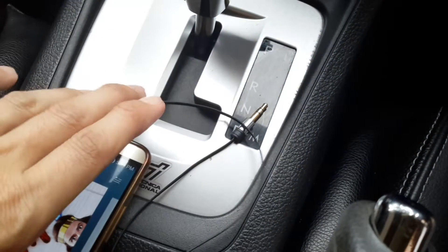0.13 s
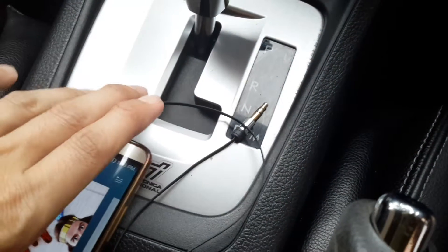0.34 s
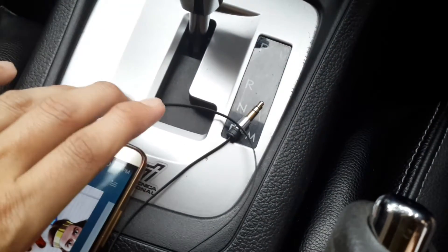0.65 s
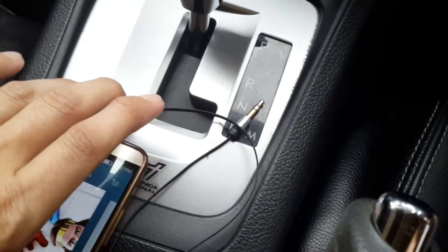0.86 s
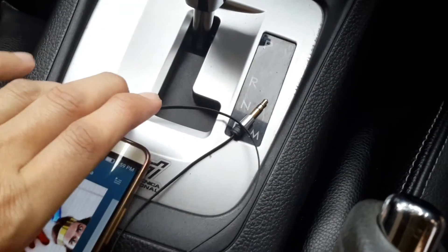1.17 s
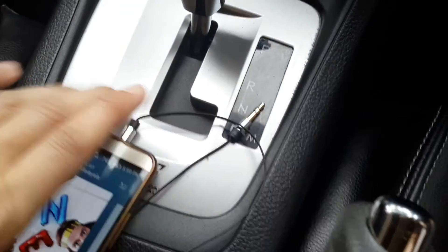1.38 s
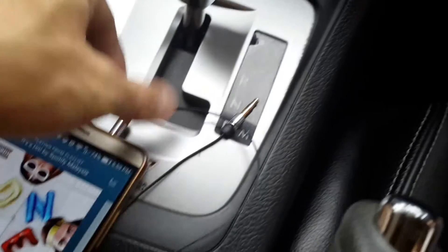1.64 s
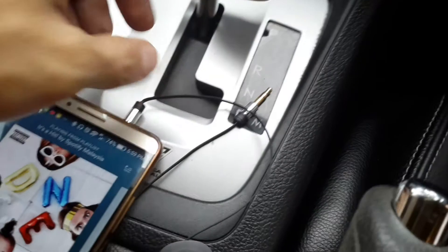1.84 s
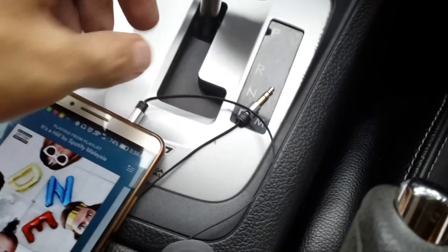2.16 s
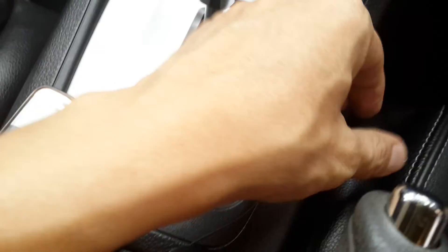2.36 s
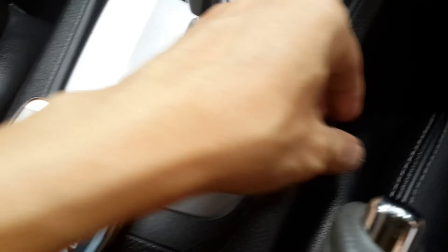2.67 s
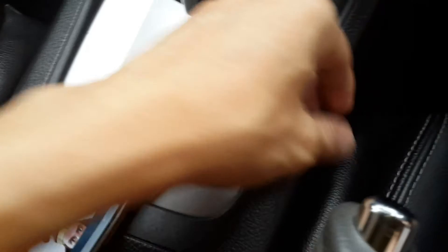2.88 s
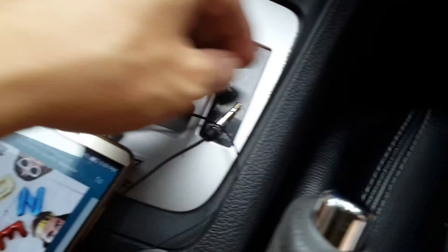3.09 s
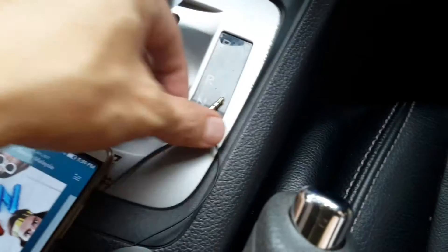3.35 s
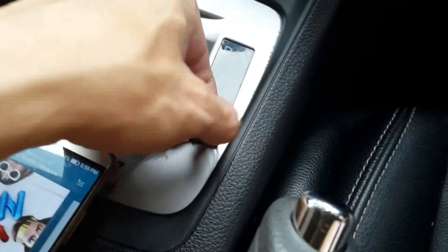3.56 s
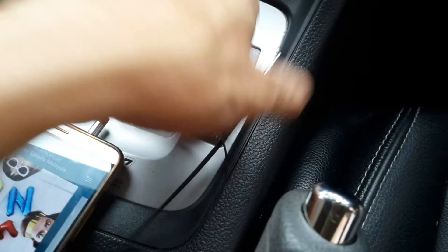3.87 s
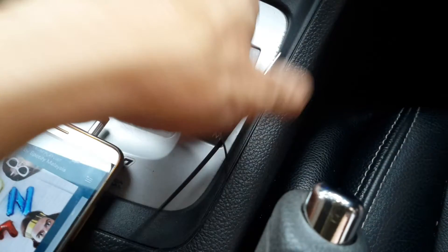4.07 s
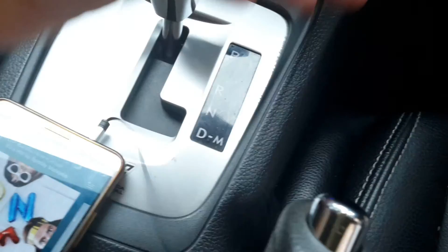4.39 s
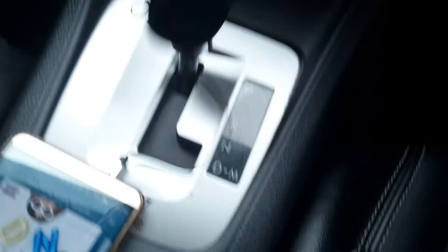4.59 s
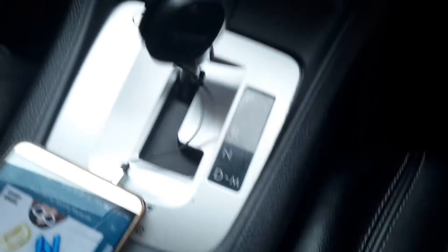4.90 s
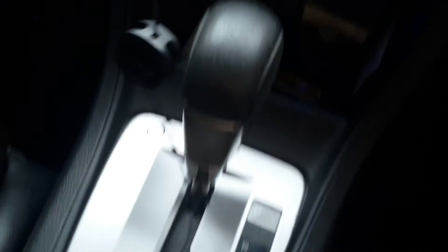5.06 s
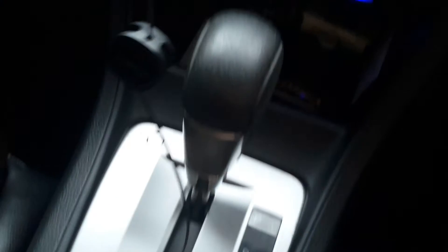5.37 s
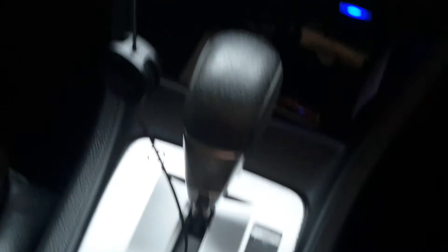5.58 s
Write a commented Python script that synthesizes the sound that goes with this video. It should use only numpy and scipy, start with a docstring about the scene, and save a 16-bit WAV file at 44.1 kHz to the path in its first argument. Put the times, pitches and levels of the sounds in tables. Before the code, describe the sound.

Inside a quiet closed car, a plug and cable tick on hard plastic, one click sharp and loud. After a lull, ticks multiply as the cable is pulled away, peaking in a crisp, hissy rattle. A last click, a soft rub and low handling thuds follow. Close handheld microphone, thin high hiss and faint low murmur.

```python
"""Cabin murmur and microphone hiss run throughout a closed, parked car where a hand moves a phone.
A few ticks of metal plug and cable on hard plastic come first, one of them loud, with trim thuds and a shifting grip.
From 2.7 s the cable drags off the gear console: ticks crowd in, hardest near 4.06 s, hiss and rattle surge to 4.3 s.
Near 4.95 s come last ticks and a palm rub; squeezes and thuds follow to 5.4 s.
Ticks excite port, shell and panel resonances; the rest is shaped noise and damped low cycles. Port rings near 8.6 kHz."""
import sys
import numpy as np
from scipy import signal
from scipy.io import wavfile
from scipy.ndimage import uniform_filter1d

SR = 44100
rng = np.random.default_rng(int(sys.argv[2]) if len(sys.argv) > 2 else 0)


def ratio(d):
    """dB to gain"""
    e = np.asarray(d, float) / 20
    return 10 ** e


def generate_wav(sig):
    """Save sig (samples, or channels by samples) to the path in sys.argv[1] as 16-bit PCM at SR."""
    pcm = np.round(np.clip(np.atleast_2d(sig).T, -1, 1) * 32767).astype(np.int16)
    wavfile.write(sys.argv[1], SR, pcm)


N = 253134  # samples


def evened(x):
    """Scale to unit rms."""
    return x / np.sqrt(np.mean(x ** 2) + 1e-20)


def peaked(x):
    """Scale to unit peak."""
    return x / abs(x).max()


def smoothed(x, size):
    """Two running means in a row."""
    return uniform_filter1d(uniform_filter1d(x, size=size), size=size)


def read(points, hz):
    """Spectrum in dB, linear over log frequency, falling to -100 dB an octave beyond its ends."""
    f, db = np.transpose(points)
    octaves = np.log2(np.r_[f[0] / 2, f, f[-1] * 2])
    return np.interp(np.log2(hz + 1), octaves, np.r_[-100, db, -100])


def add(mix, start_s, sound):
    """Mix a sound in at its start time, cut at the end of the mix."""
    part = mix[round(start_s * SR):][:len(sound)]
    part += sound[:len(part)]


def causal(points):
    """Minimum-phase impulse response with the given colour."""
    half = np.log(ratio(read(points, np.fft.rfftfreq(2048, 1 / SR))))
    full = np.r_[half, half[-2:0:-1]]
    phase = -signal.hilbert(full).imag
    return np.fft.ifft(np.exp(full + 1j * phase)).real[:1024]


def noise(points, patchy_db, swell_db, size=1024):
    """Unit-rms noise: random short-time spectra with drifting patches and a slow swell."""
    frames, hz = 4 * N // size + 5, np.fft.rfftfreq(size, 1 / SR)
    real, imag, patches = rng.standard_normal((frames, len(hz), 3)).T
    patches = uniform_filter1d(patches, size=10, axis=0)  # over frequency
    patches = evened(uniform_filter1d(patches, size=12, axis=1))  # over time
    swell = evened(smoothed(rng.standard_normal(frames), 30))
    level_db = read(points, hz)[:, None] + patchy_db * patches + swell_db * swell
    spectra = (real + 1j * imag) * ratio(level_db)
    return evened(signal.istft(spectra, nperseg=size, noverlap=size - size // 4)[1][:N])


RISE_SHARE, ENDS_DB = 0.27, -22.5  # rise as share of length; level at each end re peak


def swells(peaks_s, levels_db, lengths_s):
    """Summed gains that rise to each peak and fall away again, straight in dB."""
    t = np.arange(N) / SR
    gain = np.zeros(N)
    for peak_s, db, length_s in zip(peaks_s, levels_db, lengths_s):
        away = np.maximum((peak_s - t) / RISE_SHARE, (t - peak_s) / (1 - RISE_SHARE)) / length_s
        gain += ratio(db + ENDS_DB * away)
    return gain


def rung(modes, spot_hz, db_per_octave):
    """Modes of a struck part, randomly off pitch and level; the struck spot favours those near its pitch."""
    t = np.arange(4096) / SR
    out = np.zeros(len(t))
    for hz, db, t60_s in modes:
        off, lean = rng.standard_normal(2)
        start_db = db + 4.4 * lean - db_per_octave * abs(np.log2(hz / spot_hz))
        out += ratio(start_db - 60 * t / t60_s) * np.sin(2 * np.pi * hz * (1 + 0.032 * off) * t)
    return out


# plug, cable and phone on hard plastic: (time [s], port ring peak [dB], snap re port [dB],
# panel re port [dB], favoured panel pitch [Hz], favoured snap pitch [Hz])
TICKS = [(0.4353, -45, -3.5, -1, 996, 3500), (0.5105, -33.5, -7, -5.5, 1190, 6000),
         (0.549, -45, -25, -9.5, 760, 6700), (0.8735, -11, -9.5, -17, 1280, 4900),
         (0.668, -62, -4, -18, 894, 6500), (1.133, -51.5, -18, -1, 977, 4000),
         (1.491, -65, -1, -14, 806, 5020), (1.543, -62, -25, -6, 800, 5000),
         (1.595, -57, -7, 11.5, 513, 2700), (2.483, -40.5, -10.5, -4, 790, 3500),
         (2.9533, -56, -12, 15, 680, 2700), (2.9539, -60, -13, 14, 1690, 2700),
         (3.145, -58, 0, -2, 1600, 4100), (3.2047, -51.5, -4, 5.5, 900, 4100),
         (3.281, -51, -4, 4, 856, 4100), (3.308, -39.5, -27, -7.5, 796, 5600),
         (3.4136, -39.5, -2, 0.5, 1050, 3300), (3.4315, -50, -3, -18, 773, 6200),
         (3.461, -25.5, -5.5, -10.5, 1050, 3600), (3.5264, -33, -4, -9, 1220, 5200),
         (3.557, -51, -13, 0, 1790, 2700), (3.642, -46, -5, -17, 848, 3000),
         (3.6689, -35, -10, 0, 1850, 3000), (3.731, -38, 3, -0.5, 1560, 3500),
         (3.7535, -47, -15, -11, 1000, 3000), (3.7687, -25.5, -3.5, -7, 2320, 4000),
         (3.8011, -34.5, -7.5, 1, 1120, 3200), (4.0257, -40.5, -16.5, 0, 1020, 5200),
         (4.036, -45, -18, 8.5, 735, 4800), (4.0463, -32, -6, 4, 1050, 5200),
         (4.0625, -8.5, -11.5, -15.5, 1670, 5800), (4.0658, -22.5, -6, -0.5, 1500, 5100),
         (4.068, -21.5, -6.5, -8, 866, 5100), (4.071, -28.5, -11, -15, 1300, 5100),
         (4.075, -25, -4, 3, 900, 5100), (4.078, -13.5, -13, -18.5, 1300, 5500),
         (4.085, -25, -2, -11, 1390, 4900), (4.089, -28.5, -10, -2, 1610, 5100),
         (4.1004, -37, 2.5, 7, 1740, 5500), (4.1064, -39, 7, 8, 1740, 2700),
         (4.1255, -41, -12, 13, 1660, 2700), (4.143, -28.5, -2.5, 1, 1380, 6000),
         (4.158, -29.5, -4, -21.5, 1340, 5000), (4.164, -25, -7.5, -2, 1010, 3200),
         (4.1799, -37.5, -1, 7, 1000, 3000), (4.187, -27, 1, 1, 1370, 9100),
         (4.1924, -26, 3.5, -4, 1400, 9100), (4.1932, -22, -3, -5, 1530, 5500),
         (4.196, -25, -8, -5, 1480, 11000), (4.1985, -29, 3, -12, 1510, 5100),
         (4.2021, -25, -1, 3, 1540, 5100), (4.205, -27, -2, -2.5, 1200, 4100),
         (4.2084, -26.5, 5, 5.5, 1500, 5100), (4.226, -30, 0, -3.5, 1380, 5500),
         (4.251, -27.5, 2, -20, 1630, 9100), (4.257, -26, -12, -18, 1700, 4100),
         (4.266, -34, -4, -5, 1700, 3300), (4.345, -30.5, -7.5, -9.5, 900, 6000),
         (4.594, -56, 4.5, 2, 767, 5200), (4.947, -30, -12, -17, 813, 5100),
         (4.9495, -17.5, -22, -28, 813, 5050), (4.95, -24, -11, -20, 826, 14000),
         (4.957, -30, -16, -25, 826, 6700)]
# microphone port resonance: (frequency [Hz], relative level [dB])
PORT = [(3820, -36), (6500, -13.5), (7480, -7), (8190, 2), (8530, 6), (9310, -1), (11000, -20.5),
        (12000, -25), (12900, -29), (14500, -32.5)]
# plug and shell modes: (nominal frequency [Hz], relative level [dB], t60 [s])
SNAP_MODES = [(2790, 4, 0.0037), (3300, 1, 0.005), (4100, -2, 0.004), (5070, 0.5, 0.0063),
              (5600, -7, 0.005), (6700, 6.5, 0.0047), (9100, 3.5, 0.015), (11000, -2.5, 0.0081),
              (13900, -14, 0.0044)]
# plastic panel modes: (nominal frequency [Hz], relative level [dB], t60 [s])
PANEL_MODES = [(434, -13, 0.033), (687, -8.5, 0.04), (840, -12, 0.032), (1050, -5, 0.029),
               (1300, -4, 0.0063), (1640, 9, 0.011), (1960, -2.5, 0.014), (2247, 5, 0.017)]
HELD_FROM_S = 4.04  # cable lies loose before, fingers damp it after
LOOSE_T60_S, HELD_T60_S, PANEL_T60_SHARE = 0.048, 0.031, 0.87  # close reflections
CABIN_T60_S, CABIN_DB = 0.24, (-23.5, -19.5, -18.5)  # late reflections at port, shell, panel
LOOSE_CRACK_DB, HELD_CRACK_DB = 18.5, 21  # first contact over reflections, for a tick at FIRM_DB
HARDER_DB_PER_DB, FIRM_DB = 0.15, -24  # stronger ticks have a harder first contact
CRACK_DELAY_S = 0.00051  # short slip before the contact
CONTACT_S = (0.00002, 0.00004, 0.00008)  # contact pulse width at port, shell, panel
REBOUND_S, REBOUND_DB = 0.00024, -2.5  # delay, mean level re contact


def ticks():
    """One hard contact and its reflections excite the port, the brittle shell modes and the panel modes."""
    out, t = np.zeros(N), np.arange(SR // 4) / SR
    port = causal(PORT)
    for start_s, db, snap_db, panel_db, panel_hz, snap_hz in TICKS:
        held = start_s > HELD_FROM_S
        t60_s, crack_db = (HELD_T60_S, HELD_CRACK_DB) if held else (LOOSE_T60_S, LOOSE_CRACK_DB)
        height = ratio(crack_db + HARDER_DB_PER_DB * (db - FIRM_DB))
        contacts = [height * np.exp(-((t - CRACK_DELAY_S) / w) ** 2) / np.sqrt(1 + 2 * (w * SR) ** 2)
                    for w in CONTACT_S]
        rebound = ratio(rng.normal(REBOUND_DB, 2)) * np.roll(contacts[0], round(REBOUND_S * SR))
        contacts[0] = contacts[0] + rebound  # port only

        dense, lumps = rng.standard_normal((2, len(t)))
        clumps = ratio(2.1 * evened(uniform_filter1d(lumps, size=30)))
        reflections = dense * (1 - np.exp(-t / 0.0017))
        late = reflections * ratio(-60 * t / CABIN_T60_S)
        bodies = port, rung(SNAP_MODES, snap_hz, 24.7), rung(PANEL_MODES, panel_hz, 23.2)
        t60s = t60_s, t60_s, PANEL_T60_SHARE * t60_s
        levels_db = db, db + snap_db, db + panel_db
        tick = np.zeros(len(t))
        for body, contact, ring_s, late_db, level_db in zip(bodies, contacts, t60s, CABIN_DB, levels_db):
            close = reflections * clumps * ratio(-60 * t / ring_s)
            drive = contact + close + ratio(late_db) * late
            tick += ratio(level_db) * peaked(signal.fftconvolve(drive, body)[:len(t)])
        add(out, start_s, tick)
    return signal.sosfilt(signal.butter(2, 250, "high", fs=SR, output="sos"), out)


# cable gathered up over plastic: (time [s], slip hiss level [dB], panel rattle level [dB])
DRAG = [(2.7, -102, -91), (3.05, -75.5, -69), (3.3, -65.5, -68), (3.5, -62, -57.5), (3.82, -55.5, -56.5),
        (4.01, -58, -57), (4.13, -68, -58), (4.17, -53, -56), (4.269, -44.5, -53.5), (4.335, -57.5, -57.5),
        (4.39, -60.5, -61), (4.549, -69, -64.5)]
# short jerks of the cable: (peak time [s], hiss level [dB], rattle level [dB], length [s])
JERKS = [(0.44, -56, -56.5, 0.12), (0.554, -62, -61, 0.21), (1.64, -67.5, -61, 0.99),
         (4.062, -103, -46, 0.15), (4.093, -41.5, -42.5, 0.115), (4.19, -29.5, -34, 0.04),
         (4.324, -49.5, -57, 0.038)]
# hiss of the slips: (frequency [Hz], relative level [dB])
DRAG_COLOUR = [(2600, -12), (5000, -19.5), (7100, -16), (7800, -15.5), (8200, 4.5), (8600, -1.5),
               (9000, -4), (10700, -15), (13500, -30)]
# rattle of the panel: (frequency [Hz], relative level [dB])
RATTLE_COLOUR = [(150, -39), (250, 7), (383, -4.5), (529, -9.5), (671, -8), (760, 0), (880, 0.5),
                 (1940, -14), (3000, -24), (3900, -32.5), (6600, -120)]
SLIPS_PER_S = 4000


def drag():
    """Tiny uneven slips, in clumps, over a smooth scrape; the same slips hiss and rattle the panel."""
    clumps = ratio(2.05 * evened(uniform_filter1d(rng.standard_normal(N), size=150)))
    sizes = ratio(1.85 * np.minimum(rng.exponential(1, N), 4)) * rng.standard_normal(N)
    slips = sizes * (rng.random(N) < SLIPS_PER_S / SR)
    grit = evened(slips * clumps) + 0.69 * rng.standard_normal(N)
    t, out = np.arange(N) / SR, np.zeros(N)
    slide_s, *slides_db = np.transpose(DRAG)
    peak_s, *jerks_db, length_s = np.transpose(JERKS)
    for colour, slide_db, jerk_db in zip((DRAG_COLOUR, RATTLE_COLOUR), slides_db, jerks_db):
        sound = evened(signal.oaconvolve(grit, causal(colour))[:N])
        slide = ratio(np.interp(t, slide_s, slide_db, -np.inf, -np.inf))  # silent outside the table
        out += (slide + swells(peak_s, jerk_db, length_s)) * sound
    return out


# padded trim and camera body: (time [s], swell peak [dB], pitch [Hz], length scale [cycles])
THUDS = [(0.452, -31, 301, 2.95), (0.461, -42, 131, 3.6), (0.877, -36.5, 386, 1.3),
         (1.594, -41.5, 275, 2.5), (1.752, -47.5, 282, 3.1), (2.159, -48, 134, 3.3),
         (2.952, -41.5, 230, 1.04), (3.203, -43, 298, 3.5), (3.549, -37.5, 119, 2.6),
         (3.583, -47, 114, 4.5), (3.801, -47, 293, 6.6), (4.057, -44, 300, 4), (4.182, -33.5, 284, 9.7),
         (4.233, -31, 95, 1.1), (4.913, -48, 98, 1.6), (4.947, -42, 267, 5.5), (5.045, -39.5, 81, 1.6),
         (5.117, -30, 150, 1.4), (5.212, -37, 130, 1.2), (5.237, -31.5, 126, 2.8), (5.262, -34.5, 142, 1.4),
         (5.371, -36.5, 141, 3.1)]


def thuds():
    """Soft blows: a few low cycles that swell, sag slightly in pitch and die."""
    out = np.zeros(N)
    for start_s, db, hz, cycles in THUDS:
        turns = np.arange(0, 3.1 * cycles, hz / SR)
        age = turns / cycles
        swell = peaked(age * np.exp(-2.6 * age ** 1.18))
        add(out, start_s, -ratio(db) * swell * np.sin(2 * np.pi * turns * (1 - 0.0018 * age)))
    return out


# hand squeezes the camera: (peak time [s], level [dB], length [s])
GRIP = [(0.535, -50, 0.1), (1.602, -61.5, 0.9), (1.96, -59, 0.17), (2.077, -70, 0.28), (3.306, -62, 0.35),
        (3.582, -53.5, 1), (4.23, -40.5, 0.13), (4.375, -52.5, 0.39), (4.99, -51.5, 0.19),
        (5.048, -49.5, 0.7), (5.12, -46, 0.2), (5.245, -39, 0.12), (5.381, -42, 0.089)]
# squeeze rumble: (frequency [Hz], relative level [dB])
GRIP_COLOUR = [(15, -26), (40, -9), (80, 2), (140, -1.5), (250, -9), (380, -19)]


def grip():
    """The changing grip rumbles through the camera body as swelling low noise."""
    return swells(*np.transpose(GRIP)) * noise(GRIP_COLOUR, patchy_db=1.5, swell_db=0, size=2048)


# skin on the camera body: (frequency [Hz], relative level [dB])
RUB_COLOUR = [(88, -27), (150, -11), (185, -11), (264, -6), (540, -6.5), (864, -6.5), (1000, -13),
              (1500, -16.5), (3200, -28.5), (6240, -30), (7800, -23), (8700, -14), (10000, -23),
              (12400, -39), (13500, -65)]
RUB_START_S, RUB_RISE_S, RUB_HOLD_S = 4.945, 0.021, 0.12  # hold counts from the start
RUB_DB, RUB_FADE_DB_PER_S, RUB_GRAIN_DB = -48, 43, 1.0


def palm_rub():
    """Palm slides on the camera body: coloured noise, its level grained by skin sticking and slipping."""
    t = np.arange(N) / SR - RUB_START_S
    fade_db = RUB_FADE_DB_PER_S * np.maximum(t - RUB_HOLD_S, 0)
    stroke = np.clip(t / RUB_RISE_S, 0, 1) * ratio(RUB_DB - fade_db)
    stick = evened(smoothed(rng.standard_normal(N), 250))
    return stroke * ratio(RUB_GRAIN_DB * stick) * noise(RUB_COLOUR, patchy_db=1.2, swell_db=0, size=512)


# camera sways in the hand: (time [s], level [dB])
SWAY = [(1.46, -85), (1.53, -59), (1.7, -62.5), (2.1, -68), (2.2, -85), (4.9, -86), (4.97, -51),
        (5.28, -55), (5.42, -85)]
# sway rumble: (frequency [Hz], relative level [dB])
SWAY_COLOUR = [(20, -9), (33, -8), (55, 1), (85, -6.5)]


def sway():
    """The camera swaying in the hand gives a deep rumble of slow noise."""
    level_db = np.interp(np.arange(N) / SR, *np.transpose(SWAY))
    return ratio(level_db) * noise(SWAY_COLOUR, patchy_db=2, swell_db=-1, size=4096)


# outside noise through the closed car: (frequency [Hz], relative level [dB])
MURMUR_COLOUR = [(12, -49), (20, -14), (27, -66.5), (96, 2), (181, -10), (242, -4), (356, -13.5),
                 (512, -11.5), (592, -20), (792, -13), (984, -15), (1110, -23), (1450, -19.5), (2300, -40),
                 (6500, -51), (8450, -82), (14300, -120)]
MURMUR_DB = -57.5  # rms


def cabin_murmur():
    """Outside noise muffled by the closed car: patchy low noise."""
    return ratio(MURMUR_DB) * noise(MURMUR_COLOUR, patchy_db=2.12, swell_db=-0.4, size=2048)


# microphone hiss, coloured by the port: (frequency [Hz], relative level [dB])
HISS_COLOUR = [(2600, -40.5), (3300, -37.5), (4200, -18), (5400, -36), (7000, -21), (7750, -12.5),
               (8050, -6.5), (8450, 2), (9010, -4), (10400, -16), (10900, -21), (13000, -19.5),
               (14500, -49)]
HISS_DB = -65  # rms


def microphone_hiss():
    """Microphone self-noise, peaked by the port resonance."""
    return ratio(HISS_DB) * noise(HISS_COLOUR, patchy_db=1.4, swell_db=0.4)


def scene():
    """One microphone feeds both channels."""
    handling = ticks() + drag() + thuds() + grip() + palm_rub() + sway()
    return np.tile(handling + cabin_murmur() + microphone_hiss(), (2, 1))


def top_cut(x):
    """Nothing passes above the cut-off."""
    return signal.sosfilt(signal.butter(12, 15620, fs=SR, output="sos"), x)


def record(dry):
    """Band limit: steep low-pass with its stopband from 15.9 kHz."""
    limited = signal.sosfilt(signal.cheby2(10, 50, 15900, fs=SR, output="sos"), dry)
    return top_cut(limited)


dry = scene()
out = record(dry)
generate_wav(out)
```